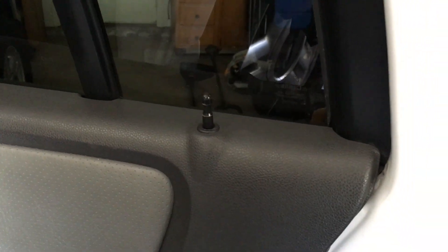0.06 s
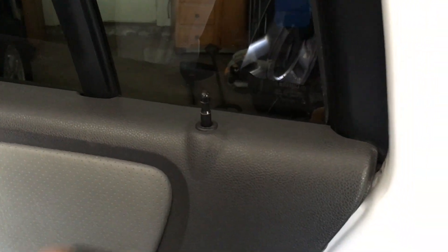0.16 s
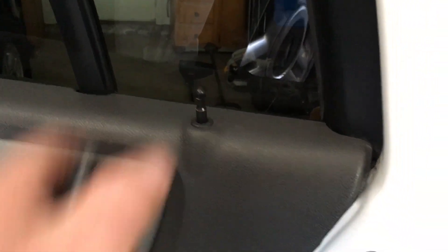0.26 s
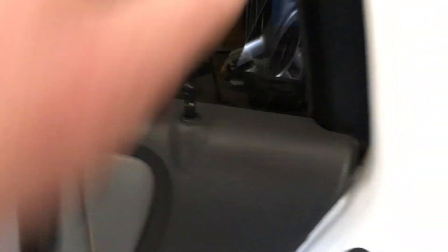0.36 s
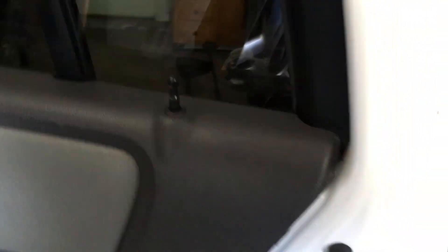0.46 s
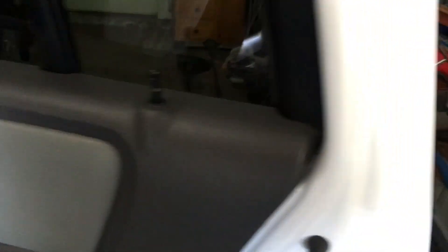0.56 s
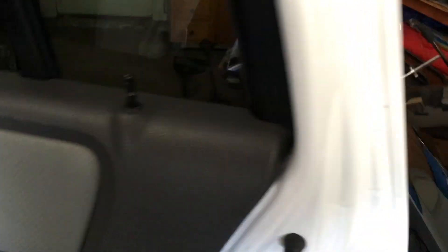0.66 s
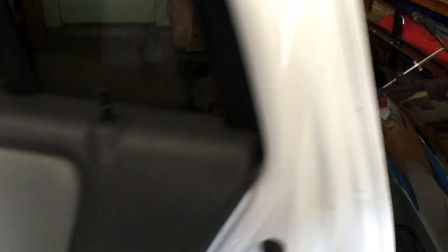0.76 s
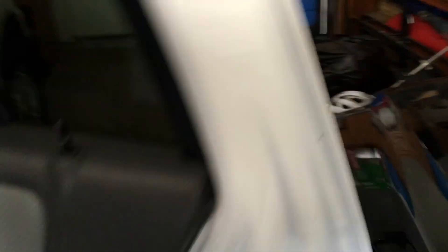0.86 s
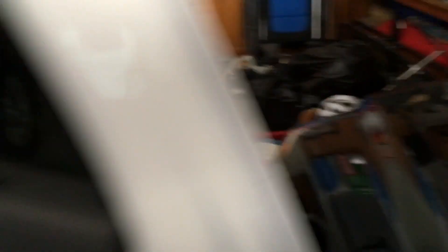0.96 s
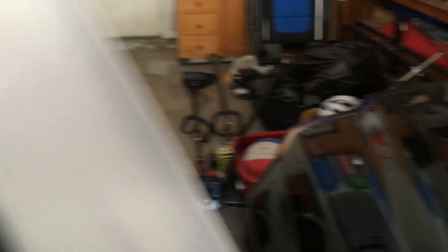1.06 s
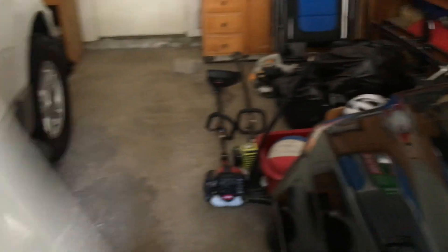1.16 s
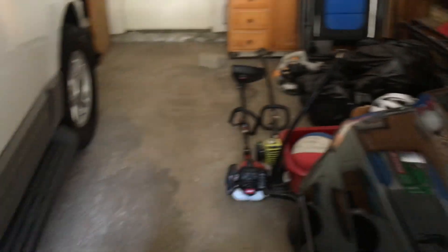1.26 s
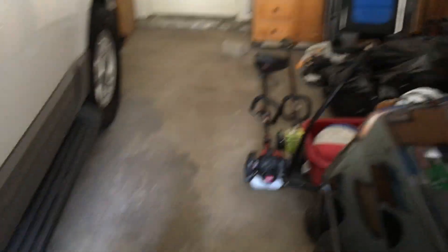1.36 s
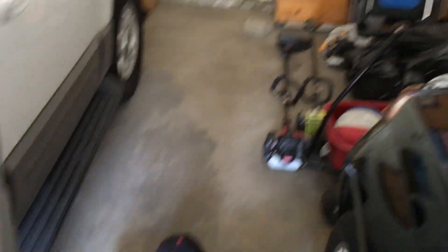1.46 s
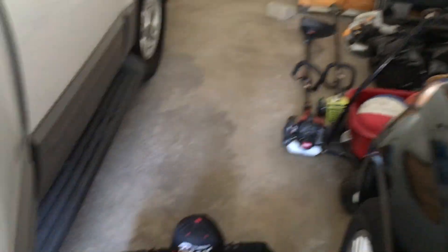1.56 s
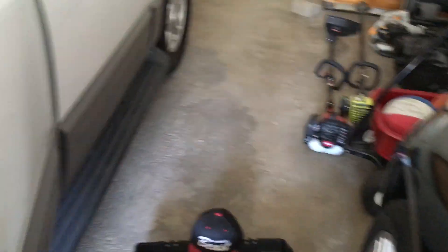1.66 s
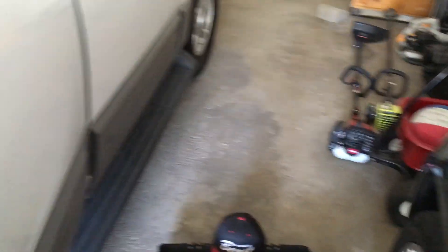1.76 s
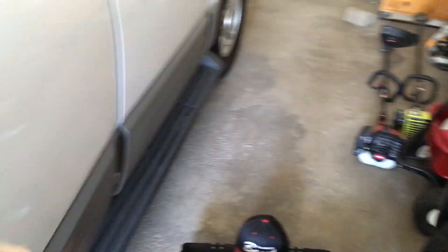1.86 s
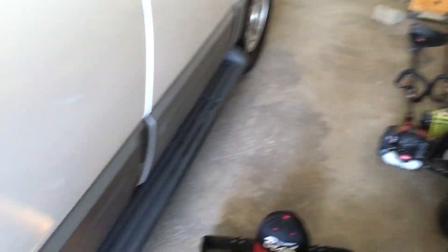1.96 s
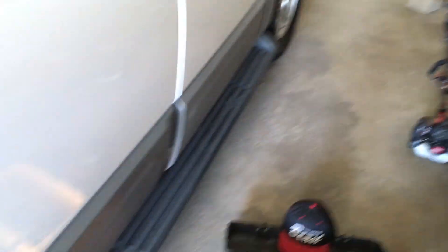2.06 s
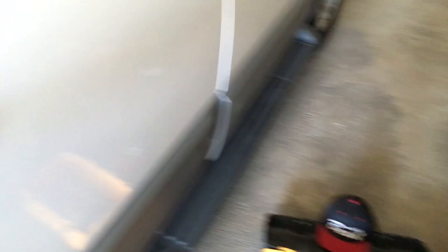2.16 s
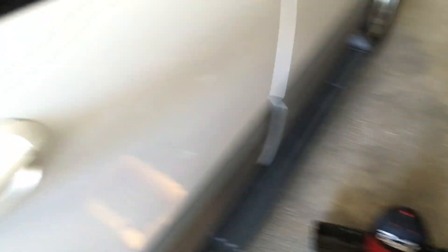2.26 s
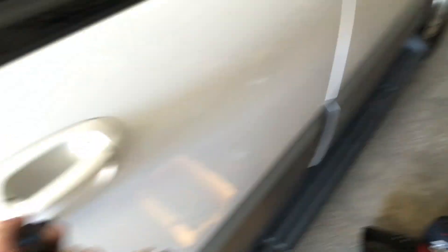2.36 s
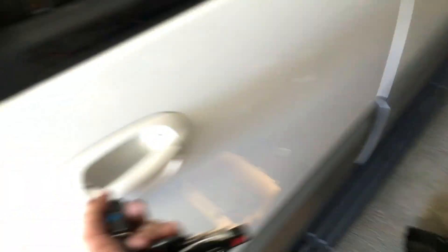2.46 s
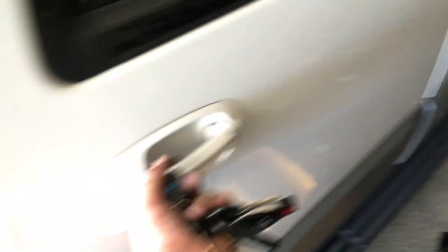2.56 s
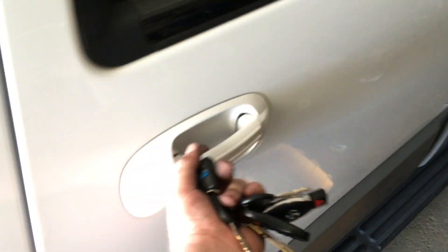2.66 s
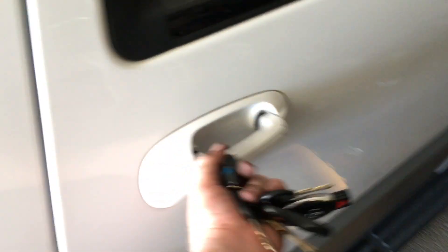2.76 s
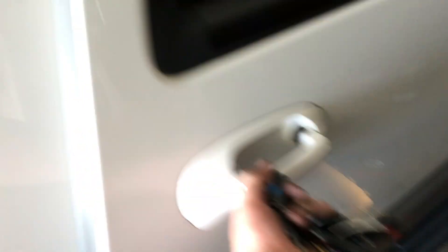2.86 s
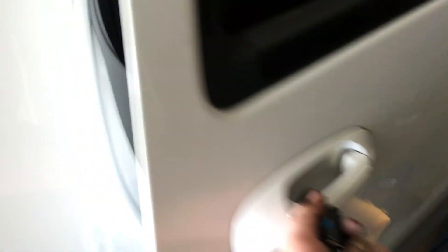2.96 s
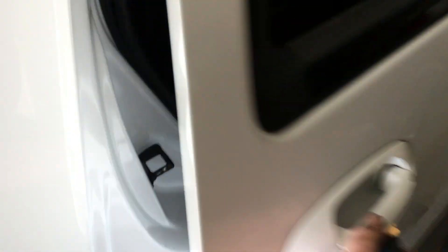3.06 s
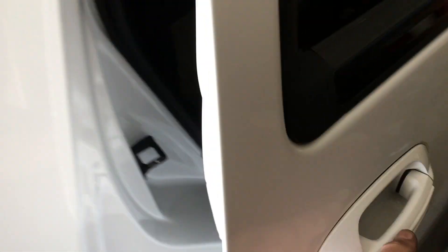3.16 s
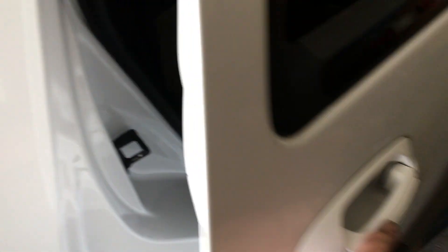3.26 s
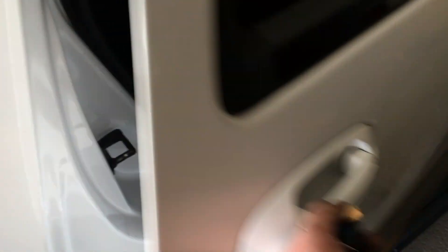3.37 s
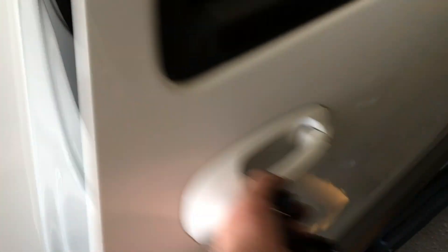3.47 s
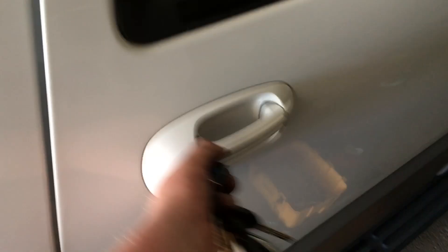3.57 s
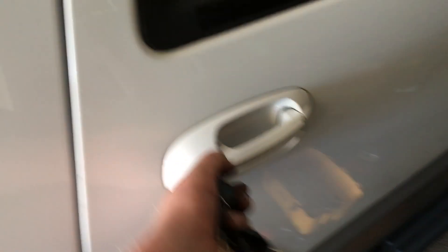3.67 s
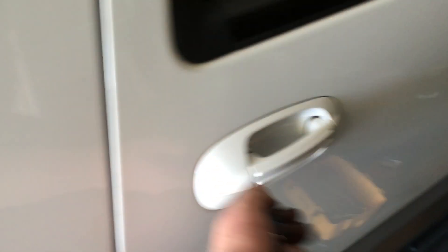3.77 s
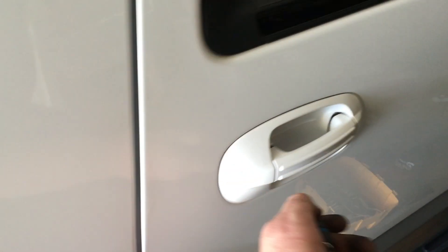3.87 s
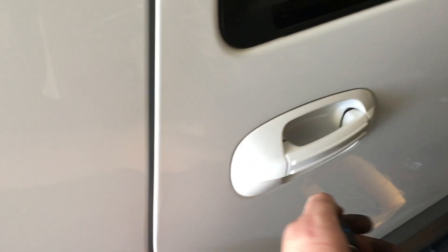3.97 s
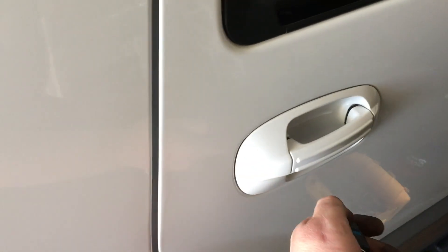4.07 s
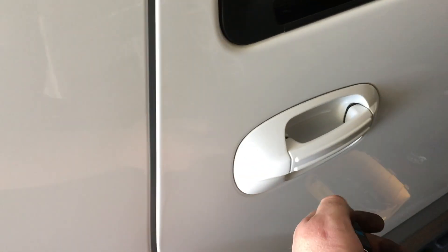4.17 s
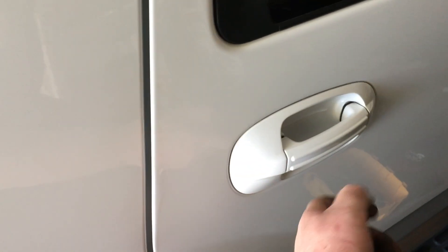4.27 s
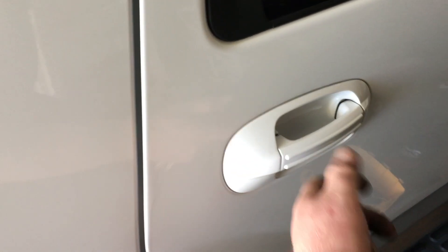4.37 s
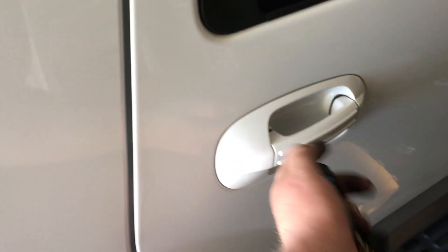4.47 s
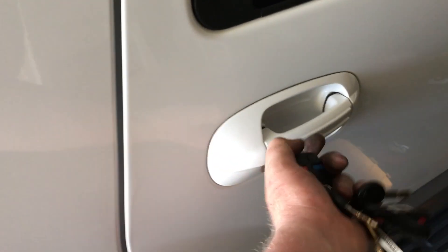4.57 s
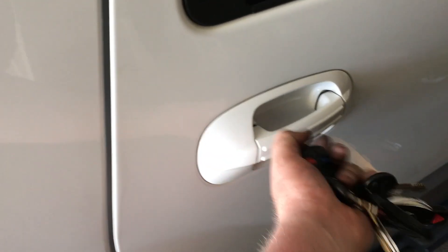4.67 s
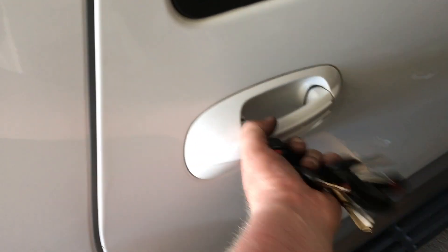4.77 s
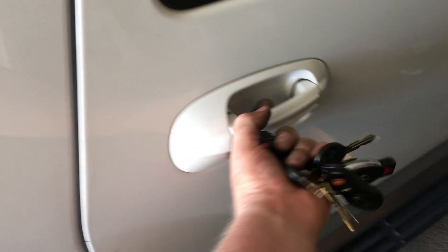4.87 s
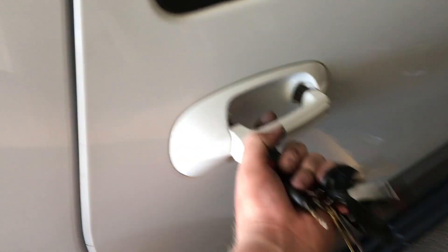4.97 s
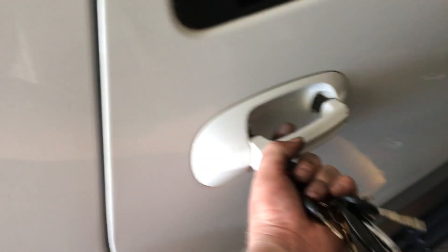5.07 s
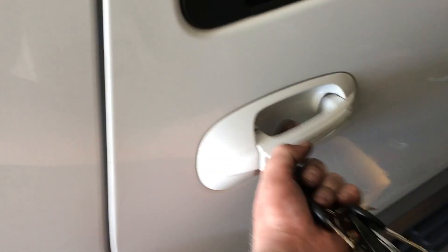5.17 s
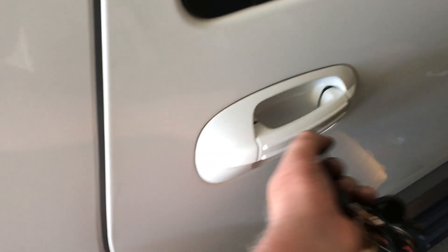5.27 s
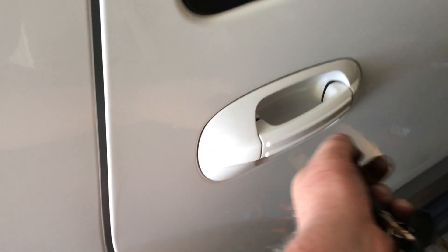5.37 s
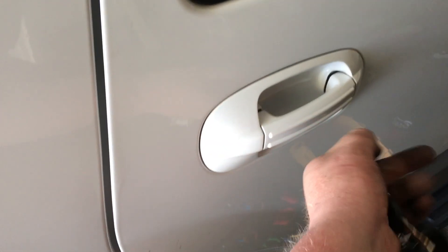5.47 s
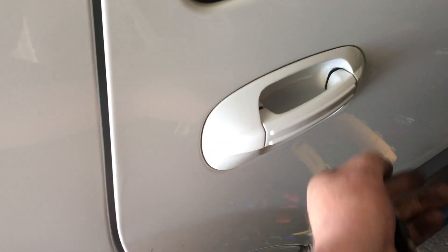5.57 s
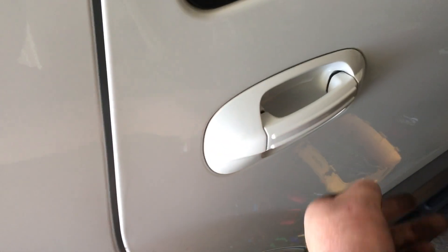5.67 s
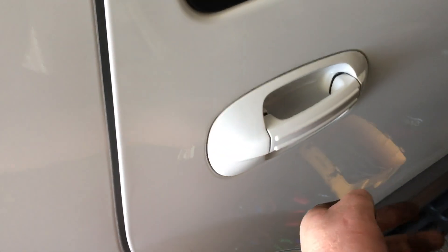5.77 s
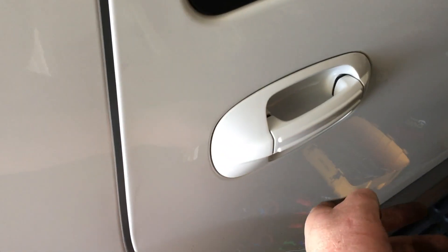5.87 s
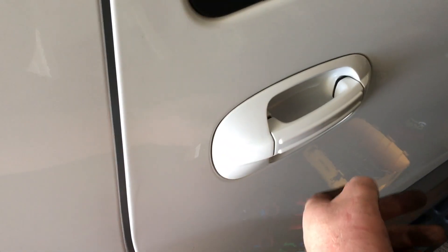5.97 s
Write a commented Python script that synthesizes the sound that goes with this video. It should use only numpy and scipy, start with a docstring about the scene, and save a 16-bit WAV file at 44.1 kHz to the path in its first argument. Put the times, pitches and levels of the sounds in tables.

```python
"""A car's rear door is shut, opened by its handle and shut again in a garage, keys in hand: each shutting is
a latch touch, a slam on the striker and a thump into the seals that sets the cabin air booming.
The power lock runs before and after; last, the handle is pulled in vain and snaps back.
Blows are shaped noise plus decaying sine modes. Clicks, clinking keys, soft bumps, a rubbing swing, a low hum
and a bed of rumble, rustle and hiss lie around them."""
import sys
import numpy as np
from scipy import signal
from scipy.fft import rfft, irfft, next_fast_len
from scipy.io import wavfile

SR = 44100
rng = np.random.default_rng(int(sys.argv[2]) if len(sys.argv) > 2 else 0)


def waveform_to_disk(signal):
    """Save audio, clipped to [-1, 1], as 16-bit WAV at the path in sys.argv[1]."""
    frames = np.transpose(np.atleast_2d(signal))
    scaled = np.clip(frames, -1, 1) * 32767
    samples = np.round(scaled).astype(np.int16)
    wavfile.write(sys.argv[1], SR, samples)


N = 265834
LENGTH = 2 ** 15   # samples in one blow
AGE = np.arange(LENGTH) / SR   # seconds since the blow

# the door is shut, timed at the slam:
# slam_s, level_db, latch_treble_db, latch_t60_s, thump_db, ring_length_share (of slam and thump)
SHUTS = [(2.073, -0.7, -5, 0.41, 0, 1.08), (3.6358, 1, 6.5, .11, -0.1, 1.08)]
# the power lock runs, fuller and drier when heard from inside the cabin:
# start_s, level_db, bass_db, treble_db, ring_length_share
LOCK_RUNS = [(-.004, -1, 4.5, 3.5, 0.48), (4.256, -0.5, -1.5, -2.5, 1)]
# modes of the door's skin and frame: pitch_hz, level_db, t60_s
DOOR_MODES = [(58.4, -9.5, 0.32), (114.8, -7.5, 0.35), (136.5, -12.5, 0.6), (202.5, -14, 0.23),
              (243.8, -11, 0.295), (358, -20.5, 0.39), (397, -13, 0.37), (423.5, -16, 0.36),
              (493, -24, 0.13), (624, -17.5, 0.48), (669, -24, 0.32), (882, -21, 0.14), (986, -22, 0.29),
              (1190, -40, 0.19), (1188, -15.5, 0.086), (1256, -15.5, 0.2), (1486, -20, 0.26),
              (1610, -41, .3), (1850, -24.5, 0.25), (1780, -33, 0.16), (2147, -22.5, 0.14),
              (2296, -26.5, 0.35), (2348, -42, 0.28), (2530, -30, 0.4), (2730, -31.5, 0.26),
              (3360, -39, 0.44), (4160, -35, 0.086), (4800, -49, 0.25), (5320, -41, 0.18),
              (6100, -32, 0.24)]
# colour of a clash of keys: frequency_hz, relative_db (per Hz)
KEY_TONE = [(300, -17), (1500, -4), (3000, -0.5), (5500, -1), (7400, 1), (10500, -2.5), (12300, 5),
            (16000, -1)]


def from_db(db):
    """Decibels to gain."""
    return 10 ** (np.asarray(db) / 20)


def rms_one(x):
    """Scale to rms 1."""
    return x / np.sqrt(np.mean(x ** 2) + 1e-20)


def decay(seconds, t60_s):
    """Exponential die-away that loses 60 dB in t60_s."""
    return np.exp(-np.log(1000) * seconds / t60_s)


def in_time(rows):
    """Each column of a curve at every sample."""
    s, *columns = np.transpose(rows)
    return [np.interp(np.arange(N) / SR, s, column) for column in columns]


def at_hz(points, hz):
    """Read a table on a log-frequency axis."""
    known_hz, values = np.transpose(points)
    return np.interp(np.log(np.maximum(hz, 1)), np.log(known_hz), values)


def add(track, s, sound):
    """Mix a sound into the track from time s; whatever falls outside the track is cut."""
    start = round(s * SR)
    sound, start = sound[max(-start, 0):], max(start, 0)
    track[start:start + len(sound)] += sound[:max(N - start, 0)]


def envelope(start_s, end_s, attack_s, release_s):
    """Exponential rise until the start, hold, exponential fall after the end."""
    t = np.arange(N) / SR
    before_start = np.minimum(t - start_s, 0)
    after_end = np.maximum(t - end_s, 0)
    return np.exp(before_start / attack_s - after_end / release_s)


def octave_noise():
    """White noise split into octaves: (centre Hz, band) pairs."""
    size = 8 * LENGTH
    white = rfft(rng.standard_normal(size))
    hz = np.fft.rfftfreq(size, 1 / SR)
    centres = 32 * 2. ** np.arange(10)
    return [(c, irfft(white * (hz >= c / np.sqrt(2)) * (hz < c * np.sqrt(2)))) for c in centres]


OCTAVES = octave_noise()


def shelves(hz, bass_db, treble_db):
    """Heavy blows bring more bass, hard ones more treble."""
    return from_db(at_hz([(140, bass_db), (400, 0.022), (1000, 0), (3500, treble_db)], hz))


def coloured(x, tone, bass_db, treble_db):
    """Causal (minimum-phase) filter with the given tone, shelved at both ends."""
    hz = np.fft.rfftfreq(LENGTH, 1 / SR)
    gain = rms_one(from_db(at_hz(tone, hz))) * shelves(hz, bass_db, treble_db)
    # folding the cepstrum onto positive time gives the minimum phase
    cepstrum = irfft(np.log(gain))
    cepstrum[1:LENGTH // 2] *= 2
    cepstrum[LENGTH // 2 + 1:] = 0
    return irfft(rfft(x) * np.exp(rfft(cepstrum)))


def contact(t60_s, crack_db, room_db, low_linger):
    """A crack, the quick ring of countless close modes (lows last longer), then the garage's tail."""
    # garage reverberation: frequency_hz, t60_s
    garage = [(60, 0.92), (250, 0.31), (1000, 0.37), (4000, 0.41), (14000, 0.23)]
    out = np.zeros(LENGTH)
    start = rng.integers(0, len(OCTAVES[0][1]) - LENGTH)
    room = from_db(room_db) * (1 - np.exp(-AGE / 0.003))
    for hz, noise in OCTAVES:
        body = decay(AGE, t60_s * (hz / 1000) ** -low_linger)   # t60_s holds at 1 kHz
        tail = room * decay(AGE, at_hz(garage, hz))
        out += noise[start:start + LENGTH] * np.sqrt(body ** 2 + tail ** 2)
    out[0] += from_db(crack_db)
    return out


def ring(modes, bass_db=0, treble_db=0, scatter_db=0):
    """Decaying sines of alternating sign; scatter makes each blow strike each mode a little differently."""
    out = np.zeros(LENGTH)
    for k, (hz, db, t60_s) in enumerate(modes):
        strength = from_db(db + scatter_db * rng.standard_normal()) * shelves(hz, bass_db, treble_db)
        out += (-1) ** k * strength * np.sin(2 * np.pi * hz * AGE) * decay(AGE, t60_s)
    return out


def blows(rows, tone, crack_db, modes_db, room_db, low_linger, modes=DOOR_MODES):
    """Every blow has its own contact noise and rings the modes of the struck part."""
    out = np.zeros(N)
    for s, db, bass_db, treble_db, t60_s in rows:
        noise = coloured(contact(t60_s, crack_db, room_db, low_linger), tone, bass_db, treble_db)
        part = from_db(modes_db) * ring(modes, bass_db, treble_db, scatter_db=3.5)
        add(out, s, from_db(db) * (noise + part))
    return out


def background():
    """Garage rumble, the rustle of moving about and a faint hiss: three bands of noise that blend."""
    # level of each band: time_s, rumble_db, rustle_db, hiss_db
    air_levels = [(0, -48, -48.5, -72), (.45, -50.5, -57.5, -74), (1.0, -48.5, -52, -71.5),
                  (1.4, -46, -53.5, -76), (2.0, -47, -51, -74), (2.5, -41, -49.5, -62),
                  (2.7, -40.5, -48.5, -71), (2.9, -40, -52, -67), (3.1, -39.5, -46, -72.5),
                  (3.55, -49, -46, -70), (3.95, -38.5, -50, -66), (4.2, -43.5, -51, -72),
                  (4.45, -41, -46.5, -65.5), (4.78, -46, -49.5, -70), (5.2, -36, -51, -74),
                  (5.6, -48, -51.5, -64), (5.9, -47.5, -53, -75), (6.03, -49, -44.5, -56.5)]
    # colour ahead of the split and levelling: frequency_hz, relative_db (per Hz)
    air_tone = [(20, -24), (32, -9), (60, -1.5), (110, -4.5), (205, -11), (255, -9), (350, -13), (480, -17),
                (640, -15), (1000, -18), (2000, -21.5), (3000, -29), (7000, -40), (16000, -49.5)]
    # edges between rumble, rustle and hiss, in Hz
    crossovers_hz = 281, 4520
    size = next_fast_len(N)
    hz = np.fft.rfftfreq(size, 1 / SR)
    noise = rfft(rng.standard_normal(size)) * from_db(at_hz(air_tone, hz))
    above_low, above_high = [1 - 1 / (1 + (hz / edge) ** 8) for edge in crossovers_hz]
    bands = 1 - above_low, above_low - above_high, above_high
    out = np.zeros(N)
    for band, db in zip(bands, in_time(air_levels)):
        out += from_db(db) * rms_one(irfft(noise * band, size)[:N])
    return out


def hum():
    """A low sine swells and fades."""
    pitch_hz, peak_s, peak_db = 47.94, 5.08, -30.5
    level = from_db(peak_db) * envelope(peak_s, peak_s, attack_s=0.35, release_s=0.24)
    return level * np.sin(2 * np.pi * pitch_hz * np.arange(N) / SR)


def bumps(width_octaves, crack_db, room_db, pitch_db):
    """Dull bumps of hand, feet and door panel: soft contacts, each ringing around one pitch."""
    # start_s, level_db, pitch_hz, t60_s
    bump_rows = [(0.206, -44, 657, 0.23), (1.301, -36.5, 179, 0.16), (2.857, -17, 124, 0.06),
                 (3.153, -37.5, 766, 0.062), (3.321, -35.5, 691, .09), (4.079, -40.5, 244.6, 0.32),
                 (4.471, -36.5, 582, 0.21), (5.018, -35.5, 1640, 0.087), (6.002, -41.5, 767, 0.31)]
    out = np.zeros(N)
    for s, db, hz, t60_s in bump_rows:
        below, above = hz / 2 ** width_octaves, hz * 2 ** width_octaves
        tone = [(hz / 10, -26), (below, -12), (hz, 0), (above, -12), (hz * 20, -55)]
        knock = coloured(contact(t60_s, crack_db, room_db, low_linger=0), tone, 0, 0)
        add(out, s, from_db(db) * (knock + ring([(hz, pitch_db, t60_s)])))
    return out


def clicks(crack_db, modes_db):
    """Small dry clicks of fob and trim, hard and close; the shorter the click, the shorter the trim rings."""
    # start_s, level_db, treble_db, t60_s, room_db
    click_rows = [(.2, -52.5, 0.5, .06, -4), (0.4286, -42.5, -5, 0.019, -36), (.613, -55, 5.5, 0.012, -12),
                  (1.137, -49, -3, 0.18, -2.5), (1.3997, -54.5, 3.5, 0.02, -18),
                  (1.512, -29.5, 1, 0.082, -12), (2.4071, -30, -1.5, 0.027, -20),
                  (2.417, -40.5, 3, .025, -17), (3.033, -43.5, -0.5, 0.17, -15.5),
                  (3.6629, -28.5, 10, .011, -18), (3.6756, -23.5, 2.5, .03, -24),
                  (4.121, -40.5, 3, .011, -32), (4.7073, -43.5, 0, .05, -18), (4.8364, -33.5, 3, .027, -22),
                  (5.1559, -26.5, -2.5, .011, -33), (5.254, -20, -1.5, .0056, -20.5)]
    # frequency_hz, relative_db (per Hz)
    click_tone = [(200, -34), (1500, -5.5), (3300, 3.5), (5000, 0.5), (9000, -1), (10500, -7),
                  (16000, -5.5)]
    # hard plastic trim, before each click's own damping: pitch_hz, level_db, t60_s
    trim_modes = [(3020, -10, 0.062), (3340, -11, .08), (3760, -15, 0.1), (4340, -5, 0.082), (6100, 1, .07)]
    out = np.zeros(N)
    for s, db, treble_db, t60_s, room_db in click_rows:
        tick = coloured(contact(t60_s, crack_db, room_db, low_linger=0.11), click_tone, 0, treble_db)
        trim = from_db(modes_db) * ring(trim_modes) * np.exp(-AGE / t60_s)
        add(out, s, from_db(db) * (tick + trim))
    return out


def key_ring(count=8):
    """Each clink wakes some of the keys' modes, a little detuned by how they touch."""
    # keys on the ring, before detuning: pitch_hz, level_db, t60_s
    key_modes = [(5320, -1.5, 0.055), (6440, 0.5, .05), (7220, -2, 0.024), (8800, -3, .06),
                 (9220, 0.5, .08), (12250, -0.5, 0.1), (11700, 0, .12), (12400, -10, 0.056),
                 (12200, -9, 0.036), (14100, -9, .05), (14900, -5, .06), (15500, -9, .06)]
    detune = .03   # share of the pitch
    struck = np.array(key_modes)[rng.permutation(len(key_modes))[:count]]
    return ring([(hz * (1 + detune * rng.standard_normal()), db, t60_s) for hz, db, t60_s in struck])


def jingle(spread_db, modes_db, count=12):
    """The bunch is shaken in the hand: faint chance clinks, some duller, some brighter."""
    # start_s, length_s, clinks_per_s, level_db (before the random spread)
    shakes = [(2.577, 0.16, 34.5, -53.5), (3.027, .17, 45, -59), (4.6, 0.25, 23.6, -51.5),
              (4.852, 0.52, 90, -52), (5.459, .24, 100, -52.5), (5.697, 0.28, 25, -54)]
    treble_spread_db = 6
    ticks = []
    for _ in range(count):
        treble_db = treble_spread_db * rng.uniform(-1, 1)
        touch = contact(0.014, crack_db=8, room_db=-17, low_linger=0.11)
        ticks.append(coloured(touch, KEY_TONE, 0, treble_db))
    out = np.zeros(N)
    for start_s, length_s, rate, db in shakes:
        for k in range(int(length_s * rate)):
            clink = ticks[k % count] + from_db(modes_db) * key_ring()
            clink_db = db + spread_db * rng.standard_normal()
            add(out, start_s + (k + rng.random()) / rate, from_db(clink_db) * clink)
    return out


def keys(crack_db, modes_db, room_db):
    """Keys knock together and ring briefly, damped by the hand."""
    # start_s, level_db, t60_s
    clashes = [(2.5995, -38.5, 0.035), (2.914, -45, 0.037), (3.058, -32, .045), (4.8523, -24.5, 0.045),
               (4.8636, -21.5, 0.077), (4.8774, -36, .044), (4.928, -38.5, .05), (5.003, -38.5, .054),
               (5.067, -43.5, 0.055), (5.318, -42, .05), (5.3504, -44, .05), (5.3792, -39.5, .075),
               (5.5734, -40.5, 0.078), (5.6243, -35.5, 0.015), (5.8432, -43, 0.064)]
    out = np.zeros(N)
    for s, db, t60_s in clashes:
        clash = coloured(contact(t60_s, crack_db, room_db, low_linger=0.15), KEY_TONE, 0, 0)
        add(out, s, from_db(db) * (clash + from_db(modes_db) * key_ring()))
    return out


def lock_motor():
    """A short whirr of gears ahead of the rod grows with gathering speed, then dies away in the door."""
    # frequency_hz, relative_db (per Hz)
    motor_tone = [(100, 0), (400, 5), (1400, -6.5), (2800, -10.5), (6000, -16), (10000, -30.5),
                  (16000, -32)]
    lead_s, run_s = .028, 0.048
    start_db, growth_db_per_s = -39.5, 136   # start level is relative to the run's level
    full_t60_s = 0.41   # at a ring length share of 1
    out = np.zeros(N)
    for s, db, _, treble_db, share in LOCK_RUNS:
        level = from_db(db + start_db + growth_db_per_s * np.minimum(AGE, run_s))
        fade = decay(np.maximum(AGE - run_s, 0), full_t60_s * share)
        whirr = level * fade * rng.standard_normal(LENGTH)
        add(out, s - lead_s, coloured(whirr, motor_tone, 0, treble_db))
    return out


def lock_rod():
    """In each run the actuator throws the rod, which hits its stop and settles, ringing the housing."""
    # relative to the run: delay_s, level_db, treble_db, t60_s (at a share of 1)
    stroke = [(.005, -29, -8, 0.39), (.022, -25, -10, 0.09), (.054, -34, -18.5, 0.57),
              (.089, -37, -11, 0.06)]
    # frequency_hz, relative_db (per Hz)
    lock_tone = [(35, -20), (60, -8), (108, -3), (189, -16.5), (262, -4.5), (323, -11.5), (408, -8),
                 (1200, -17.5), (1440, -15), (2840, -15), (13900, -35.5), (16000, -42)]
    # housing and linkage: pitch_hz, level_db, t60_s
    lock_modes = [(106.3, -3.5, 0.21), (180, -20, 0.56), (254.7, -14.5, 0.23), (370.6, -11.5, .3),
                  (436.5, -15, 0.18), (661, -21, 0.5), (780, -32, 0.12)]
    rows = [(s + delay_s, run_db + db, bass_db, run_treble_db + treble_db, t60_s * share)
            for s, run_db, bass_db, run_treble_db, share in LOCK_RUNS
            for delay_s, db, treble_db, t60_s in stroke]
    return blows(rows, lock_tone, crack_db=20.5, modes_db=0.5, room_db=-5.0, low_linger=0.21, modes=lock_modes)


def handle_snaps():
    """The released handle snaps back and bounces, ringing the sheet metal around it."""
    # start_s, level_db, bass_db, treble_db, t60_s
    snap_rows = [(5.2532, -12.5, -10.5, 1.5, 0.058), (5.2615, -17.5, 3, -3, 0.1)]
    # frequency_hz, relative_db (per Hz)
    snap_tone = [(50, -17), (140, 2.5), (330, -1), (520, -0.5), (760, -1), (1150, -3), (1500, -13.5),
                 (2600, -18.5), (4000, -27), (8500, -24), (11000, -40), (16000, -61)]
    # sheet metal around the handle: pitch_hz, level_db, t60_s
    skin_modes = [(141.7, -10.5, 0.55), (248, -14, 0.39), (399, -11, 0.29), (508, -20, 0.26),
                  (640, -15, 0.28), (1020, -38, 0.2)]
    return blows(snap_rows, snap_tone, crack_db=17.0, modes_db=1.0, room_db=-13.5, low_linger=0.16,
                 modes=skin_modes)


def handle_pulls():
    """The handle works the latch or hits its stop, ringing the door."""
    # start_s, level_db, bass_db, treble_db, t60_s
    handle_rows = [(2.661, -30, -3, -6.5, 0.086), (2.8528, -9.5, 3.5, -4.5, 0.092),
                   (2.856, -14, 0, 3.5, 0.077), (3.061, -26.5, 5.5, -6.5, 0.13),
                   (4.8335, -20, -1.5, -28, 0.05), (4.925, -31, 2, -8, 0.13),
                   (5.022, -26.5, 0.5, -8.5, 0.071), (5.04, -40.5, 17.5, -4, 0.23)]
    # frequency_hz, relative_db (per Hz)
    handle_tone = [(40, -15.5), (65, -2), (130, -0.5), (250, -5), (480, -2.5), (750, -9.5), (1200, -10),
                   (1500, -16), (2700, -19.5), (4000, -23.5), (6300, -26), (7300, -44), (16000, -53)]
    return blows(handle_rows, handle_tone, crack_db=17.0, modes_db=-4.5, room_db=-13.0, low_linger=0.089)


def swing():
    """Smooth, hollow rubbing as the door swings open and back on its hinges, growing as it speeds up."""
    # frequency_hz, relative_db (per Hz)
    swing_tone = [(150, -13), (250, 9.5), (340, -5), (500, -7.5), (640, 0), (780, 0), (950, 3), (1150, -8),
                  (3000, -51)]
    start_s, end_s = 2.97, 3.61
    start_db, growth_db_per_s = -46, 8
    size = next_fast_len(N)
    tone = from_db(at_hz(swing_tone, np.fft.rfftfreq(size, 1 / SR)))
    rub = rms_one(irfft(rfft(rng.standard_normal(size)) * tone, size)[:N])
    moving_s = np.clip(np.arange(N) / SR, start_s, end_s) - start_s
    level = from_db(start_db + growth_db_per_s * moving_s)
    return level * envelope(start_s, end_s, attack_s=0.053, release_s=0.42) * rub


def at_each_shut(run, thump=False):
    """The same run of blows follows every shutting; each shutting sets the level of its own thump."""
    return [(s + delay_s, shut_db + db + thump * thump_db, bass_db, treble_db, t60_s * share)
            for s, shut_db, _, _, thump_db, share in SHUTS
            for delay_s, db, bass_db, treble_db, t60_s in run]


def latch_touches():
    """The latch claw meets the striker just before each slam."""
    # frequency_hz, relative_db (per Hz)
    latch_tone = [(100, -25.5), (300, 3), (700, -19.5), (1150, -0.5), (1450, -25.5), (2500, -30.5),
                  (4500, -27), (8000, -43), (16000, -46)]
    lead_s, touch_db = .0175, -16   # level relative to the shutting
    rows = [(s - lead_s, db + touch_db, 0, treble_db, t60_s) for s, db, treble_db, t60_s, *_ in SHUTS]
    return blows(rows, latch_tone, crack_db=-1, modes_db=-13, room_db=-9, low_linger=0.072)


def cabin_boom(push_s):
    """The door sinks into soft seals and squeezes the air, so only its lowest modes swell and beat."""
    # cabin air: pitch_hz, level_db, t60_s
    cabin_modes = [(41, -2, 0.41), (52.6, -1, 0.63), (77.7, -6, 0.34), (136.8, -3, 0.17)]
    delay_s, squeeze_db = 0.02423, -8.5   # relative to the slam
    swell = np.sin(np.pi / 2 * np.minimum(AGE / push_s, 1)) ** 2
    out = np.zeros(N)
    for s, db, *_ in SHUTS:
        add(out, s + delay_s, from_db(db + squeeze_db) * swell * ring(cabin_modes))
    return out


def seal_thumps():
    """The door bottoms out in its seals and rebounds once."""
    # relative to the shutting: delay_s, level_db, bass_db, treble_db, t60_s (at a share of 1)
    thump_run = [(.0438, -11.5, 1, 0, 0.048), (.0935, -20, -5, -1, .06)]
    # frequency_hz, relative_db (per Hz)
    thump_tone = [(35, -13), (90, -11), (180, 2), (350, -0.5), (520, -11), (1200, -18.5), (3000, -32),
                  (16000, -51)]
    return blows(at_each_shut(thump_run, thump=True), thump_tone,
                 crack_db=27.0, modes_db=-13, room_db=-11.0, low_linger=0.063)


def slams():
    """The door slams on the striker and rattles after it."""
    # relative to the shutting: delay_s, level_db, bass_db, treble_db, t60_s (at a share of 1)
    slam_run = [(0, -7, -1, -.5, 0.074), (.0052, -11, 2, .5, .09), (.0402, -20, -3.5, 3, .15),
                (.065, -25.5, -8, 7, 0.023)]
    # frequency_hz, relative_db (per Hz)
    slam_tone = [(59, -36), (100, 3.5), (277, -10), (406, 1), (583, -7.5), (991, -11), (1100, -48),
                 (1230, -11.5), (1360, -15.5), (1870, -14), (3050, -26.5), (6560, -29.5), (7940, -37),
                 (11200, -39.5), (16000, -47)]
    return blows(at_each_shut(slam_run), slam_tone, crack_db=16.5, modes_db=-3, room_db=-9.5, low_linger=0.015)


def scene():
    """Door, lock, handle and keys in the garage."""
    air = background() + hum()
    soft = bumps(width_octaves=0.62, crack_db=-1, room_db=-12.5, pitch_db=3.5)
    small = clicks(crack_db=14.5, modes_db=-17.5)
    key_bunch = jingle(spread_db=4.5, modes_db=-11.5) + keys(crack_db=7, modes_db=-9.5, room_db=-15)
    lock = lock_motor() + lock_rod()
    handle = handle_snaps() + handle_pulls()
    door = swing() + latch_touches() + cabin_boom(push_s=0.027) + seal_thumps() + slams()
    return (air + soft + small + key_bunch + lock + handle + door)[None]


def record(dry):
    """The microphone loses the deepest bass, the loudest peaks are rounded, the top is cut."""
    thin = signal.sosfilt(signal.butter(3, 32, "high", fs=SR, output="sos"), dry)
    rounded = thin / (1 + thin ** 6) ** (1 / 6)
    return signal.sosfilt(signal.ellip(10, .2, 80, 16000, fs=SR, output="sos"), rounded)


dry = scene()
out = record(dry)
waveform_to_disk(out)
```